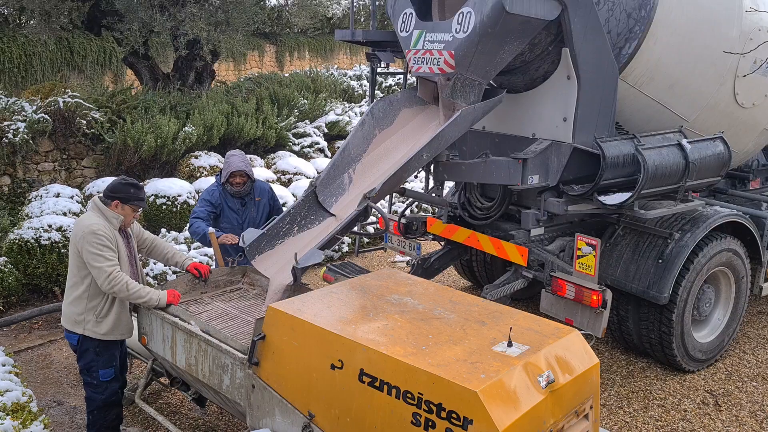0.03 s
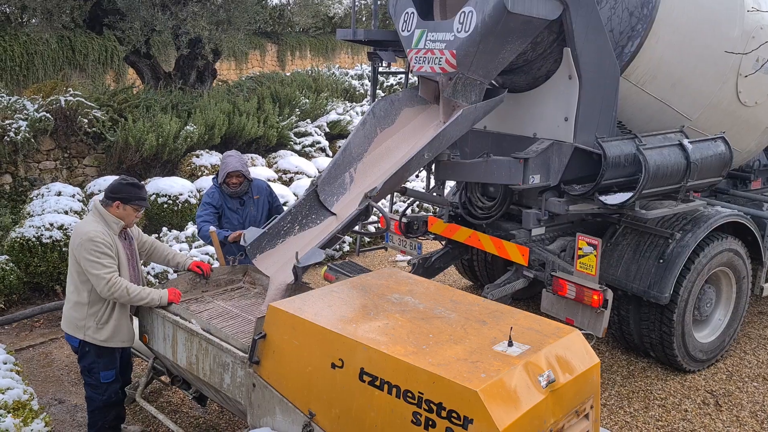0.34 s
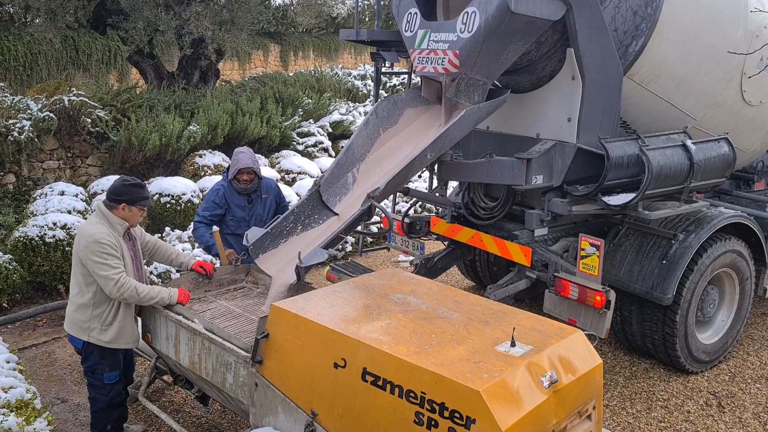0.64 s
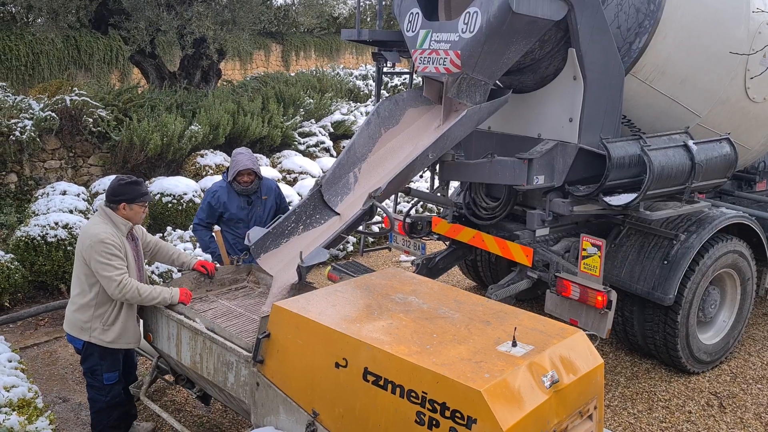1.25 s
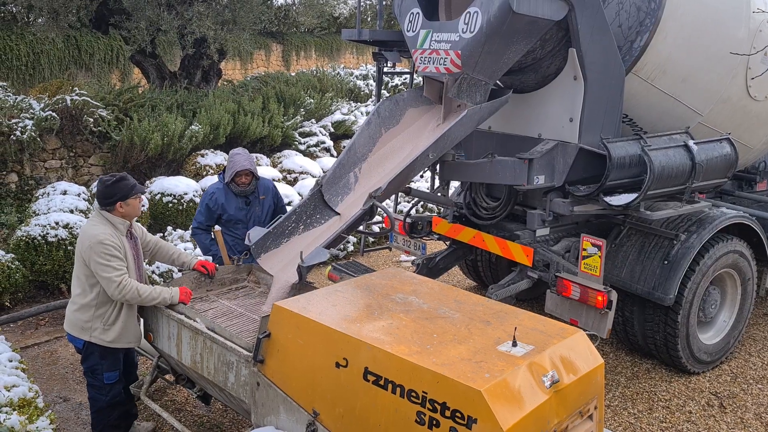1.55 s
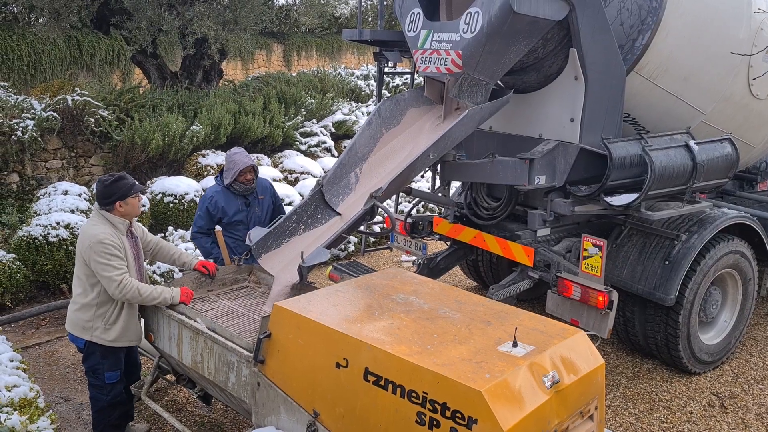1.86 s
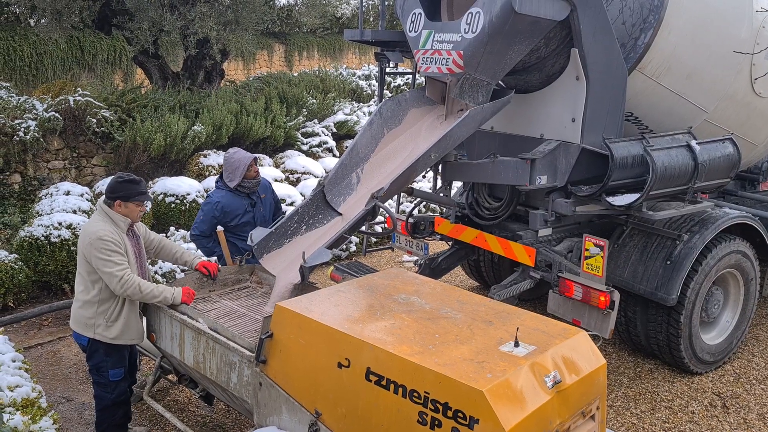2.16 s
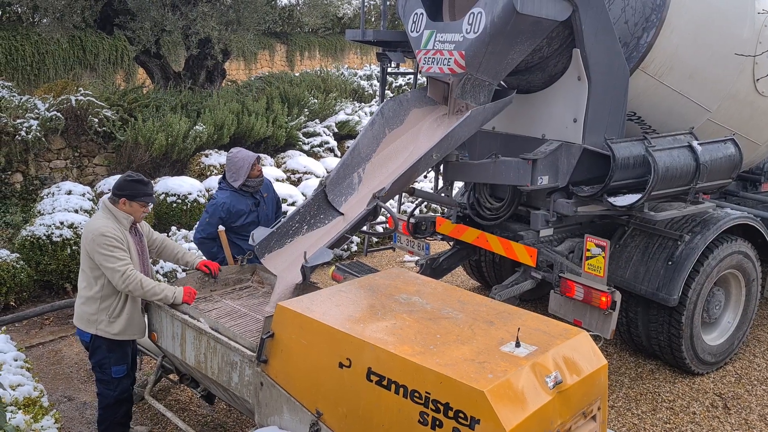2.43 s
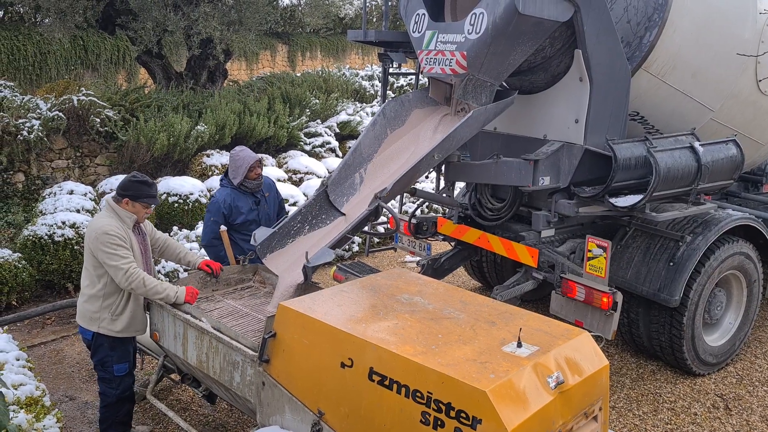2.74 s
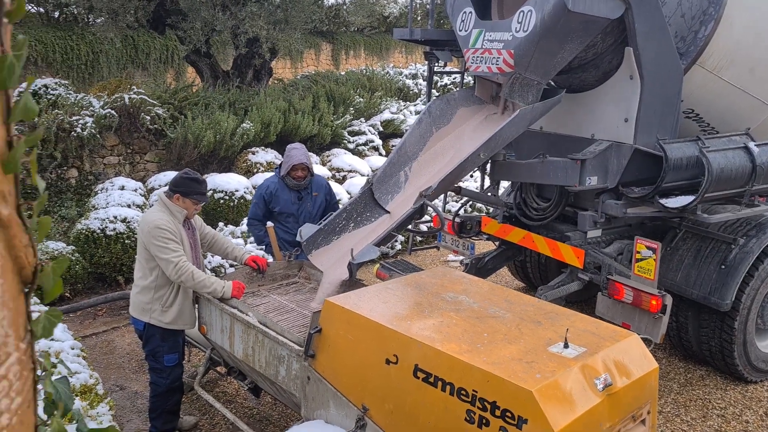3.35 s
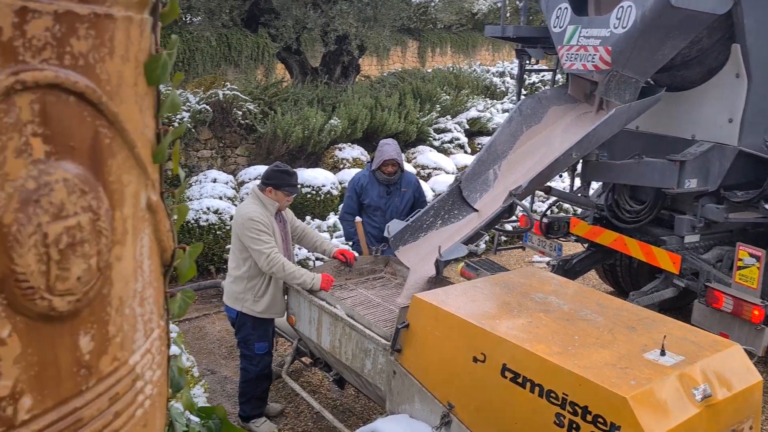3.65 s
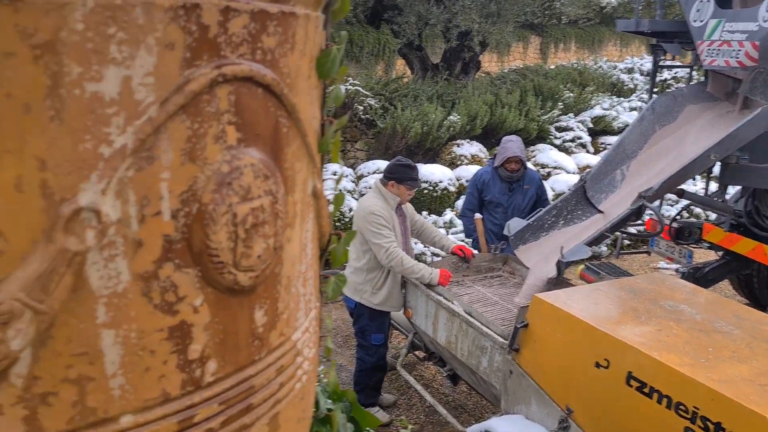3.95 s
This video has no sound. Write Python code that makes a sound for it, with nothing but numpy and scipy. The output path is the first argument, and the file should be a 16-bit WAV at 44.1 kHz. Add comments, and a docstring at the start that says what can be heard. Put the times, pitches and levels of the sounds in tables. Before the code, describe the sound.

A concrete mixer truck runs at a steady raised idle a few metres away outdoors. Its low diesel drone carries a fast clatter, hydraulic whine and rushing noise. A metallic growl swells midway, then a thin whistle rises briefly.

```python
"""A concrete mixer truck runs at a steady raised idle beside a pump, a few metres away in a garden.
From the onset its six-cylinder diesel booms through the exhaust, injectors and gears clatter alike on
every turn of the shaft, the drum's hydraulic drive whines, and combustion, fan and sliding concrete rush.
A surging metallic growl is strongest at 2.3 s, and the hydraulic pump's thin whistle at 3.3 s.
Near the end a pillar shades the upper middle of the machinery's sound."""
import sys
import numpy as np
from scipy import signal
from scipy.fft import rfft, irfft
from scipy.io import wavfile
from scipy.ndimage import uniform_filter1d, map_coordinates

SR = 44100
rng = np.random.default_rng(int(sys.argv[2]) if len(sys.argv) > 2 else 0)


def dump(signal):
    """Clip the signal to [-1, 1] and save it as 16-bit WAV at the path in sys.argv[1]."""
    limited = np.clip(np.atleast_2d(signal).T, -1, 1)
    pcm = np.round(limited * 32767).astype(np.int16)
    wavfile.write(sys.argv[1], SR, pcm)


N = 176400

SHAFT_HZ, FIRINGS_PER_TURN = 21.5, 3
SHADE_HZ, TREBLE_HZ = 900, 3450  # edges of the upper middle band
TONE_WAVER_DB, TONE_WOBBLE_RAD = 2.5, 0.34  # random spread of the whine and the whistle
# Slow swell of the growl and the low whine: time_s, gain_db
GROWL_SWELL = [(0.1, -1.1), (.8, 0), (1.1, -0.5), (1.4, 0.3), (1.62, -0.5), (2.3, 3.5), (2.7, 1.3),
               (3.1, -.5), (3.5, -3), (4.0, -1.5)]


def exhaust(turns, pipe_hz=(160, 245)):
    """Periodic firings radiate shaft harmonics, whose polarity reverses past each pipe resonance."""
    # Line spectrum of the exhaust: shaft_order, level_db
    harmonics = [(3, -15), (4, -39), (5, -52), (6, -13.5), (7, -45.5), (8, -33), (9, -25), (10, -39),
                 (11, -40), (12, -33)]
    boom = 0
    for order, level_db in harmonics:
        polarity = -np.prod(np.sign(order * SHAFT_HZ - np.array(pipe_hz)))
        amplitude = undb(level_db - 0.01 * walk(11.8))
        boom = boom + polarity * amplitude * np.cos(2 * np.pi * order * turns)
    return np.sqrt(2) * boom * pan(-2.5)


def rush(turns):
    """Combustion, fan and sliding concrete make broadband noise that throbs with the engine and flickers."""
    # Noise spectrum: frequency_hz, density_db_per_hz
    spectrum = [(25, -60), (45, -63.5), (70, -47.5), (110, -53), (160, -49.5), (225, -55), (275, -48.5),
                (330, -48.5), (390, -56.5), (440, -61.5), (520, -58), (620, -59.5), (740, -62.5),
                (900, -60), (1250, -67), (1650, -63), (2050, -69.5), (2450, -65.5), (2900, -71.5),
                (3400, -76.5), (4000, -78), (4800, -79), (5800, -80.5), (6700, -85), (7600, -97.5),
                (15500, -115)]
    noise = rng.standard_normal((2, N)) * throb(turns)
    flicker = undb(0.67 * walk(23))
    return colour(noise * flicker, spectrum)


def clatter(turns, samples_per_turn=2048, ticks_per_turn=8, tick_db=6, tick_decay_s=.0012):
    """Injector and gear impacts recur on every turn: a periodic rattle with sharp, decaying accents."""
    # Spectral envelope of the impacts: frequency_hz, density_db_per_hz
    spectrum = [(200, -76.5), (280, -60), (450, -69), (740, -64.5), (900, -68), (1250, -64), (1650, -71),
                (2050, -69.5), (2400, -75.5), (2900, -74), (3400, -78.5), (4800, -79.5), (5800, -85),
                (7600, -108), (12200, -101), (15500, -112)]
    one_turn = irfft(np.exp(2j * np.pi * rng.random((2, samples_per_turn // 2 + 1))))
    position = turns % 1 * samples_per_turn
    rattle = np.array([map_coordinates(row, [position], mode="grid-wrap") for row in one_turn])
    since_tick_s = turns * ticks_per_turn % 1 / (ticks_per_turn * SHAFT_HZ)
    accents = undb(tick_db * np.exp(-since_tick_s / tick_decay_s))
    return colour(rattle * throb(turns, turn_db=0) * accents, spectrum)


def whine(turns, swing_rad_per_db=0.23):
    """Gears and hydraulic pistons sound shaft harmonics; the churning modulates their level and phase."""
    # Tones of the drive: shaft_order (rounded below), level_db, left_minus_right_db, surge_depth_db
    partials = [(18, -36.5, -0.5, 2), (21, -46.5, 1, -1.5), (27, -47.5, 3, 0.5), (32, -44, 3, 3.5),
                (36, -38, -2, 3), (37, -46.5, -5, 3.5), (46, -47.5, 3, 0.5), (56, -47, 11, 0.5),
                (57, -45, -16, 1), (58, -49, -12, 4), (68.06, -46, 1, 2), (76.16, -48.5, -5, -1),
                (111, -50, -8, 2), (136.7, -54.5, 3, 0), (144, -61, 13, 2)]
    swell, bend = np.cos(surge_angle()), swing_rad_per_db * np.sin(surge_angle())
    low_swell_db = over_time(GROWL_SWELL)
    start_cycles = rng.random(20)  # shared within each ten orders; neighbours beat once a turn
    tones = 0
    for order, level_db, pan_db, surge_db in partials:
        order = round(order)
        cycles = order * turns + start_cycles[order // 10]
        phase = 2 * np.pi * cycles + TONE_WOBBLE_RAD * walk(14) + surge_db * bend
        tone_db = level_db + surge_db * swell + TONE_WAVER_DB * walk(9)
        if order * SHAFT_HZ < SHADE_HZ:
            tone_db += low_swell_db
        tones = tones + pan(pan_db) * undb(tone_db) * np.sin(phase)
    return np.sqrt(2) * tones


def growl(surge_db=0.5):
    """Noise excites a metallic resonance of the machinery, swelling and sinking with the churning."""
    # Resonance curve: frequency_hz, density_db_per_hz
    resonance = [(450, -88.5), (600, -67), (690, -57.5), (770, -56), (830, -59.5), (950, -70),
                 (1250, -63.5), (1600, -77), (2500, -100)]
    excitation = rng.standard_normal((2, N)) * undb(surge_db * np.cos(surge_angle()))
    return colour(excitation, resonance) * undb(over_time(GROWL_SWELL))


def whistle(turns, order=90):
    """The hydraulic pump radiates one high shaft harmonic that comes and goes."""
    # Envelope of the tone: time_s, level_db
    envelope = [(0.1, -51), (1.0, -45.5), (2.0, -48), (2.9, -46), (3.3, -40), (3.8, -44), (4.0, -49)]
    level_db = over_time(envelope) + TONE_WAVER_DB * walk(9)
    phase = 2 * np.pi * order * turns + TONE_WOBBLE_RAD * walk(17)
    return np.sqrt(2) * pan(-12) * undb(level_db) * np.sin(phase)


def hiss(turns):
    """Fast random amplitude modulation gives a fine grain to faint noise in the top octave."""
    # Noise spectrum: frequency_hz, density_db_per_hz
    spectrum = [(5000, -120), (7600, -100), (9000, -96), (10800, -93.5), (12000, -85.5), (13500, -87),
                (15500, -88.5)]
    noise = rng.standard_normal((2, N)) * throb(turns)
    grain = undb(0.6 * walk(600))
    return colour(noise * grain, spectrum)


def throb(turns, turn_db=0.5, firing_db=1.0, scatter_db=1.76):
    """Amplitude modulation once a turn and once a firing; no two firings are equally strong."""
    firings = turns * FIRINGS_PER_TURN
    deviation = rng.standard_normal(N // 100)[np.floor(firings).astype(int)]
    swell = (1 - np.cos(2 * np.pi * firings)) / 2
    return undb(turn_db * np.cos(2 * np.pi * turns) + swell * (firing_db + scatter_db * deviation))


def surge_angle(period_s=.1752, peak_s=2.128):
    """Phase in radians of the machinery's periodic churning; its cosine crests with each surge."""
    return 2 * np.pi * (np.arange(N) / SR - peak_s) / period_s


def shade(sound):
    """Three bands drift in level; near the end a pillar's acoustic shadow dims the upper middle."""
    # Band gains: time_s, lower_db, upper_middle_db, treble_db
    band_gains = [(0.101, .4, 2, 0.5), (.7, -0.6, 0.9, -0.9), (1.2, 0, 1, 0), (2.0, -1.4, 0.4, -0.2),
                  (2.6, -1.4, 0.05, 0.1), (3.15, -0.1, 0.8, 0), (3.4, -0.6, -0.2, .1), (3.7, -.5, -1, 0.7),
                  (4.0, -.3, -3.5, .1)]
    lower_gain, middle_gain, treble_gain = (undb(over_time(band_gains, band)) for band in (1, 2, 3))
    lower, under_treble = below(sound, SHADE_HZ), below(sound, TREBLE_HZ)
    upper_middle, treble = under_treble - lower, sound - under_treble
    return lower * lower_gain + upper_middle * middle_gain + treble * treble_gain


def colour(white_pair, spectrum):
    """Filtering gives two independent white signals a spectrum, an interaural level and a correlation."""
    # Sound field at the ears: frequency_hz, left_minus_right_db, correlation
    interaural = [(60, 6, 0.76), (300, -.5, 1), (450, 2.5, 0.37), (600, -8.5, .8), (810, 0.5, 0.44),
                  (1290, -11, 0.14), (2380, -8, 0.5), (3400, 0, 1), (4700, -6.5, -.25), (7000, -1, 0.4),
                  (9000, -7, 0.2), (14000, -6.5, 0.05)]
    hz = np.arange(N // 2 + 1) * SR / N
    common, opposed = rfft(white_pair / white_pair.std())
    correlation = over_frequency(interaural, hz, column=2)
    mid, side = np.sqrt((1 + correlation) / 2) * common, np.sqrt((1 - correlation) / 2) * opposed
    ears = np.array([mid + side, mid - side]) * pan(over_frequency(interaural, hz))
    return irfft(ears * undb(over_frequency(spectrum, hz)) * np.sqrt(SR / 2), N)


def pan(left_minus_right_db):
    """Left and right gains for an interaural level difference."""
    return undb(np.array([[1], [-1]]) * left_minus_right_db / 2)


def below(sound, cutoff_hz):
    """Zero-phase low-pass filter."""
    return signal.sosfiltfilt(signal.butter(2, cutoff_hz, fs=SR, output="sos"), sound)


def walk(rate_hz):
    """Random modulation: steps held for 1 / rate_hz seconds and smoothed twice, with a spread near 1."""
    hold = int(SR / rate_hz)
    steps = np.repeat(rng.standard_normal(N // hold + 1), hold)
    return 1.3 * uniform_filter1d(uniform_filter1d(steps, hold), hold)[:N]


def over_time(table, column=1):
    """A table column interpolated linearly at every sample."""
    rows = np.array(table, float)
    return np.interp(np.arange(N) / SR, rows[:, 0], rows[:, column])


def over_frequency(table, hz, column=1):
    """A table column interpolated on a logarithmic frequency axis."""
    rows = np.array(table, float)
    return np.interp(np.log(np.maximum(hz, 1)), np.log(rows[:, 0]), rows[:, column])


def undb(db):
    """Decibels to amplitude ratio."""
    return 10 ** (np.asarray(db) / 20)


def scene(start_s=.074, rise_s=.0015, first_firing_s=.0845, left_lag_s=.00007):
    """One shaft synchronises the engine's sounds; they come from the right and reach the left ear later."""
    t = np.arange(N) / SR
    shaft_hz = SHAFT_HZ * (1 + .0002 * walk(2.076) + .0007 * walk(24.89))  # slow drift, quick flutter
    turns = np.cumsum(shaft_hz) / SR - SHAFT_HZ * first_firing_s
    machinery = clatter(turns) + rush(turns) + hiss(turns) + whine(turns) + growl()
    left, right = exhaust(turns) + whistle(turns) + shade(machinery)
    left = map_coordinates(left, [(t - left_lag_s) * SR], mode="mirror")
    onset = np.clip((t - start_s) / rise_s, 0, 1)
    return np.array([left, right]) * onset


def record(dry, cutoff_hz=15750):
    """A steep elliptic low-pass filter removes the highest treble."""
    return signal.sosfilt(signal.ellip(10, .2, 80, cutoff_hz, fs=SR, output="sos"), dry)


dry = scene()
out = record(dry)
dump(out)
```